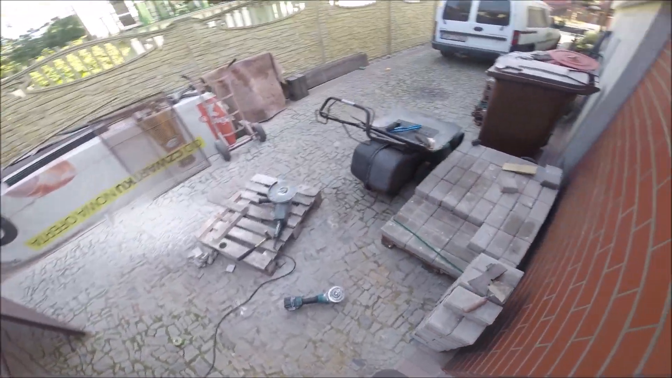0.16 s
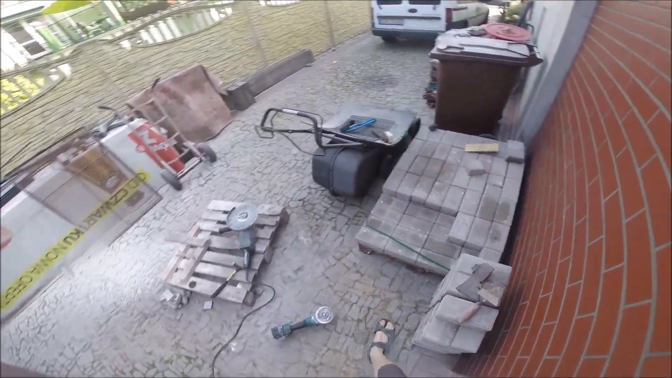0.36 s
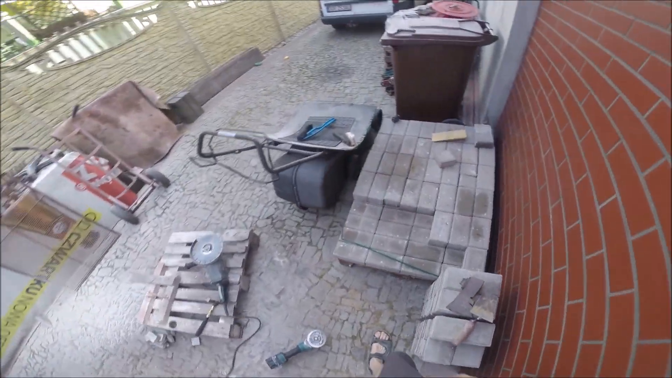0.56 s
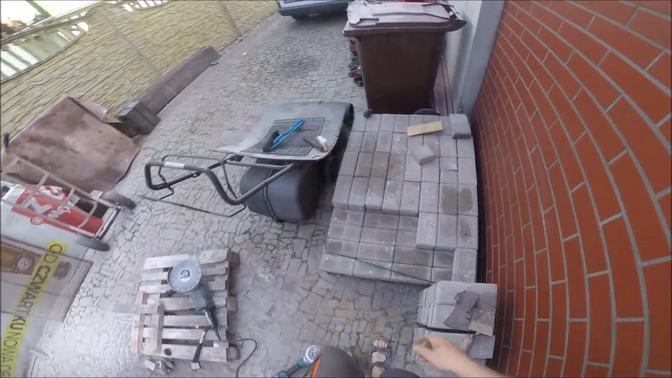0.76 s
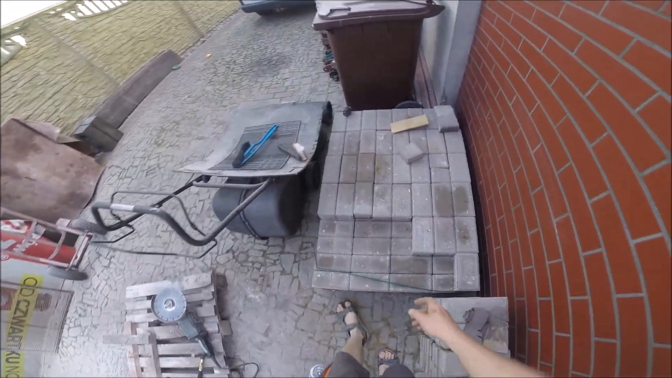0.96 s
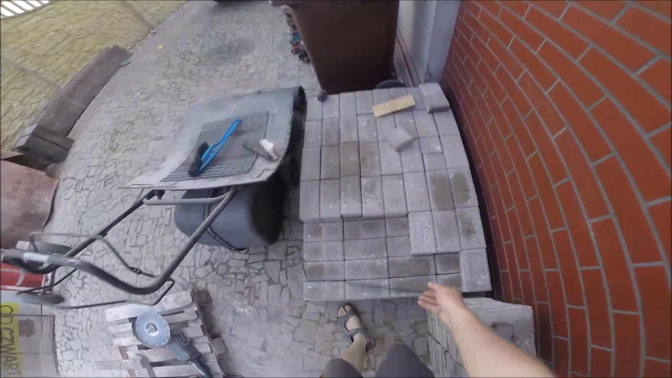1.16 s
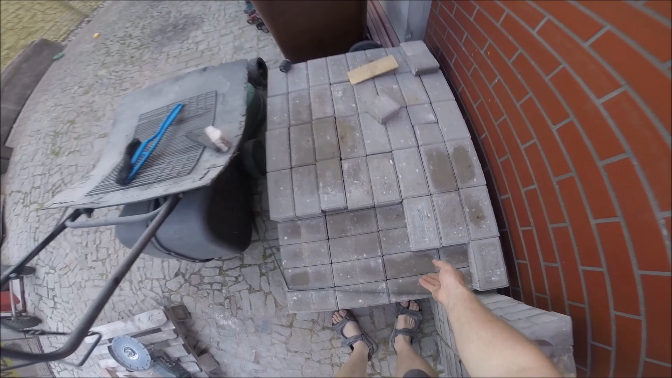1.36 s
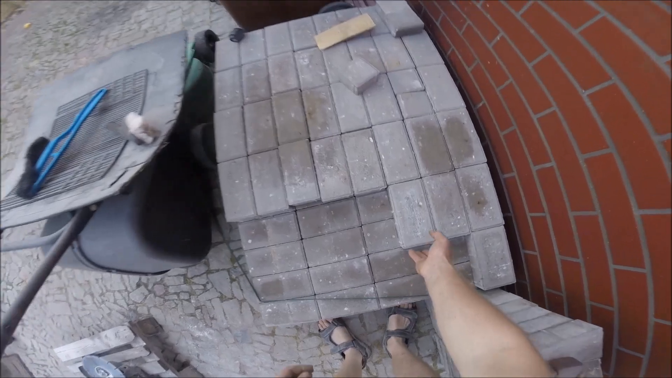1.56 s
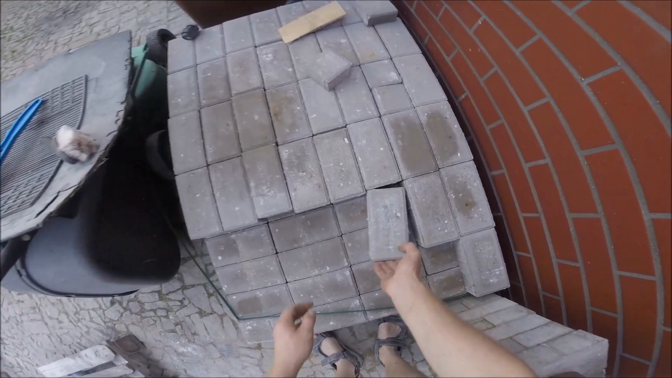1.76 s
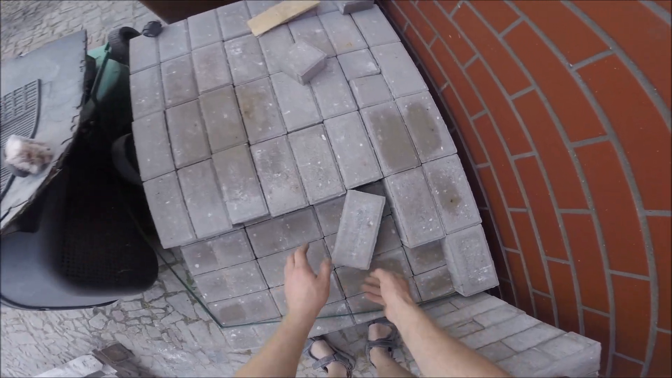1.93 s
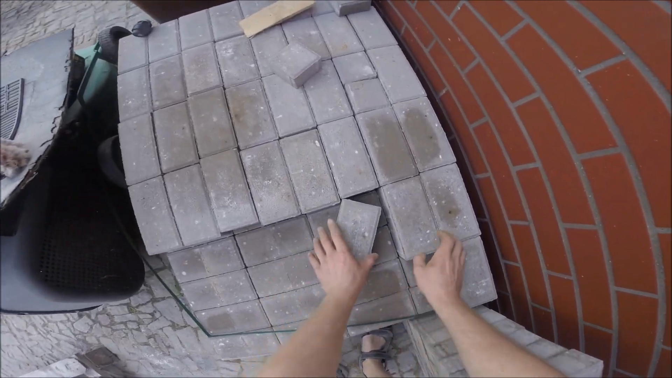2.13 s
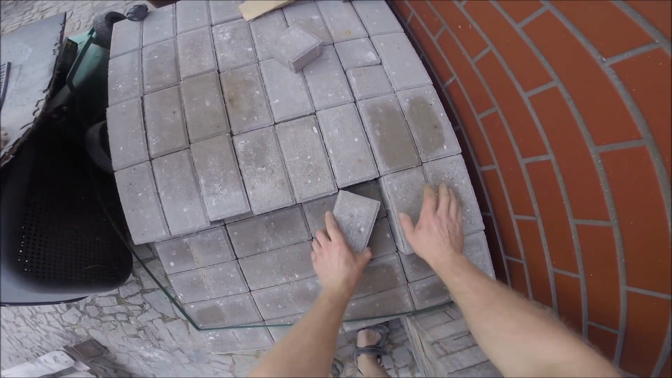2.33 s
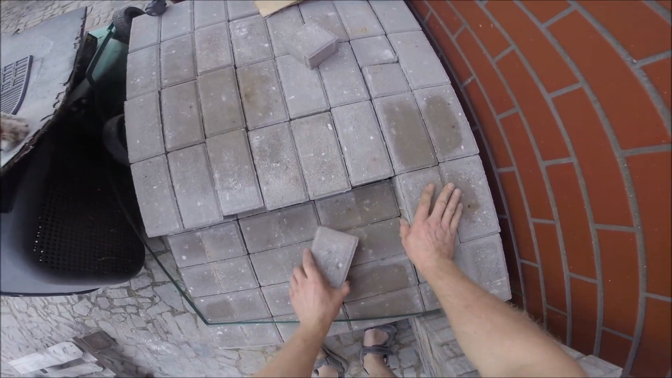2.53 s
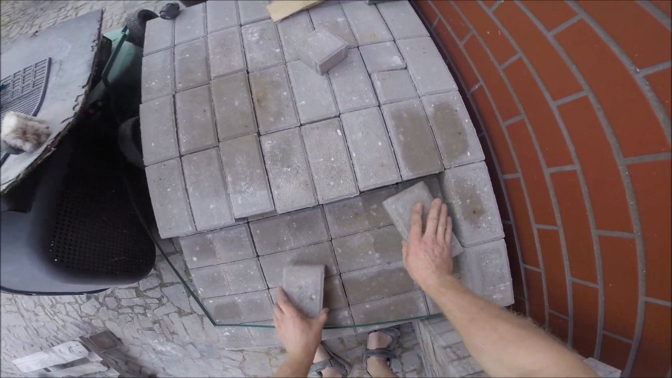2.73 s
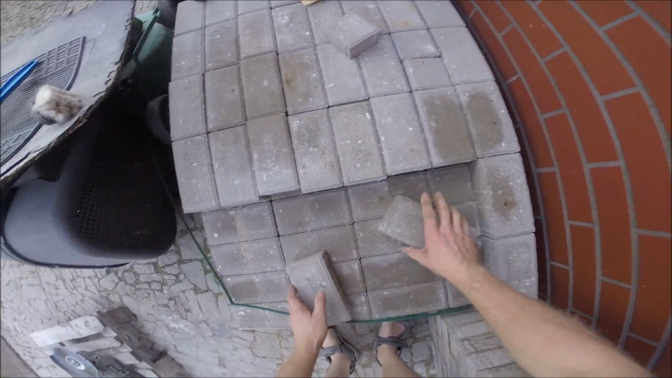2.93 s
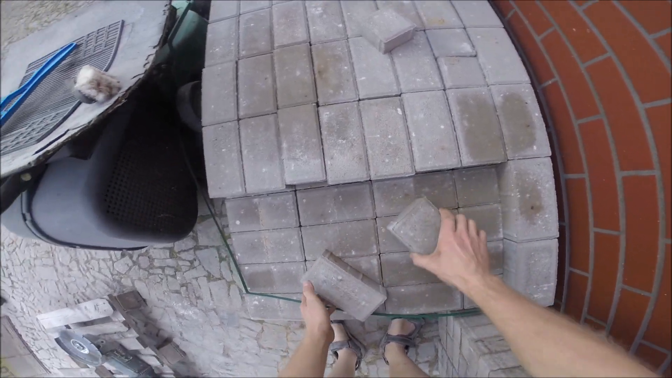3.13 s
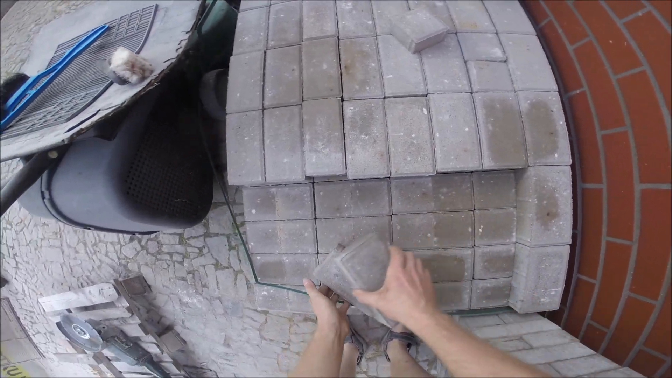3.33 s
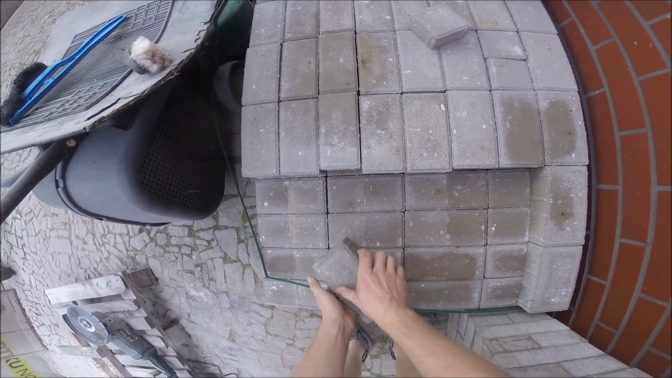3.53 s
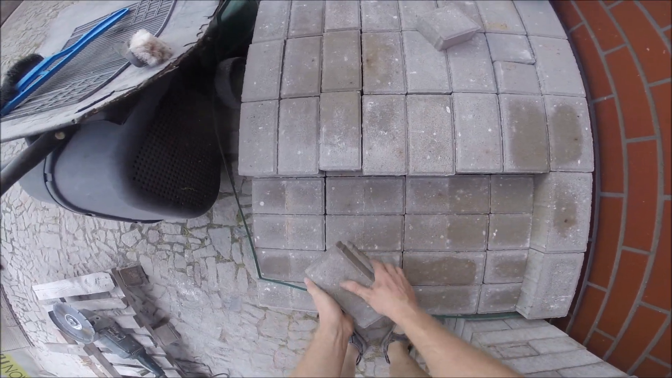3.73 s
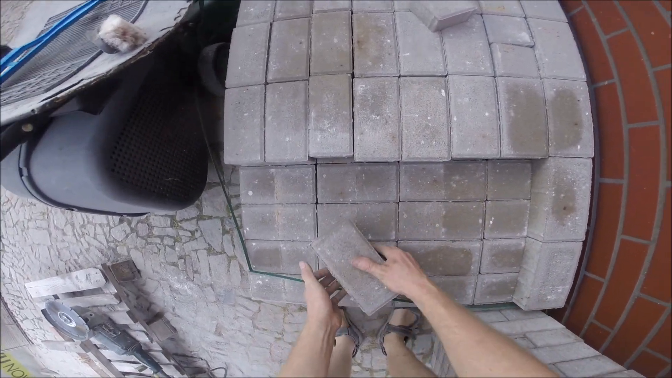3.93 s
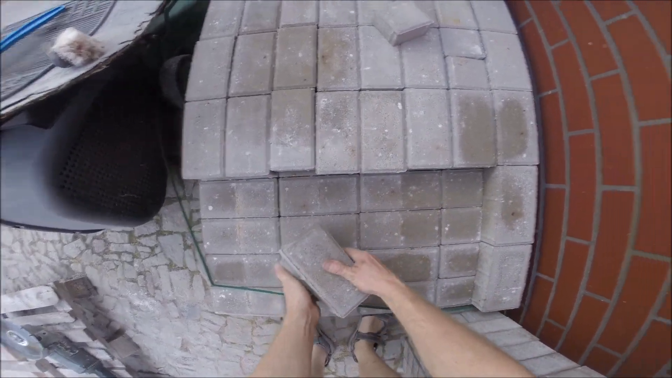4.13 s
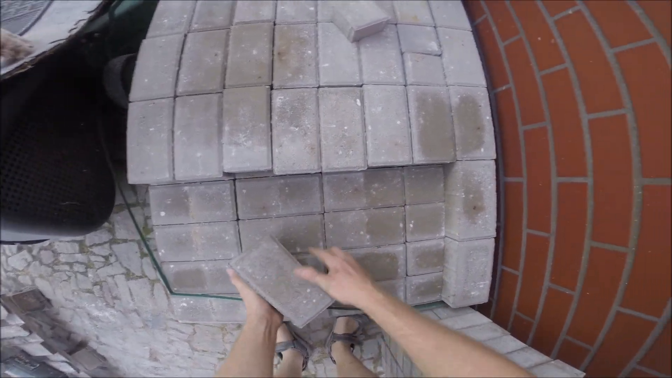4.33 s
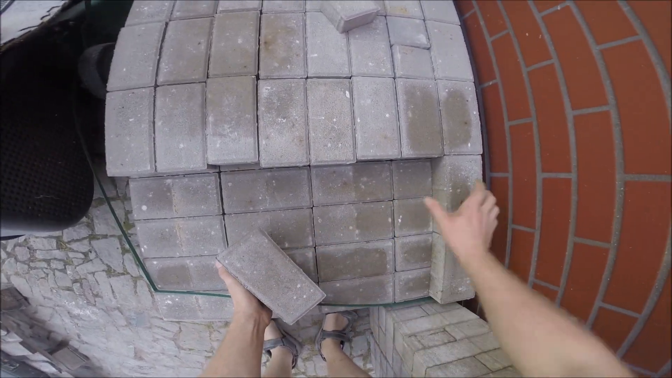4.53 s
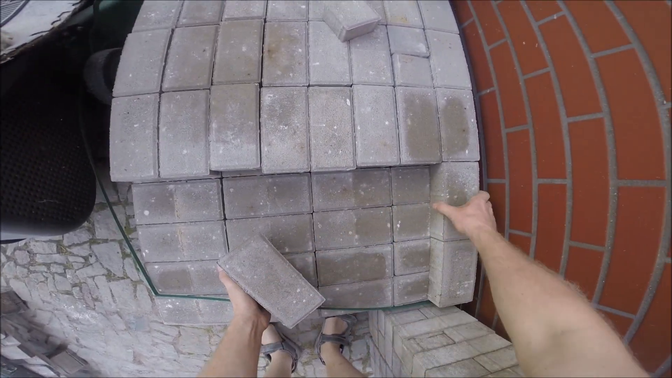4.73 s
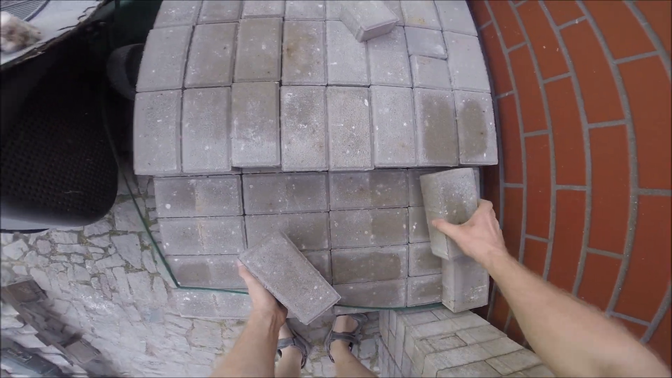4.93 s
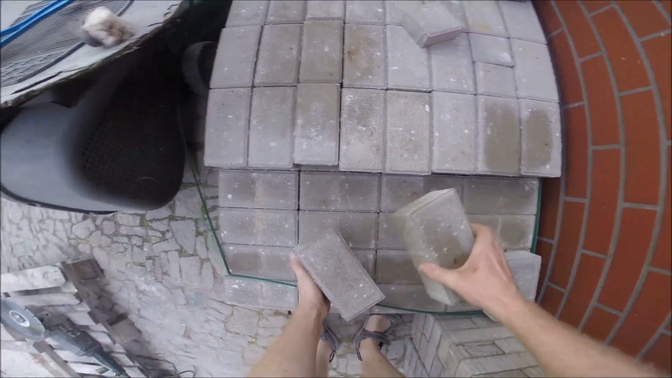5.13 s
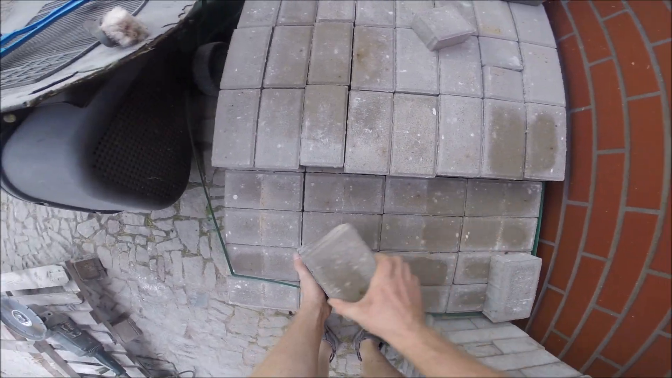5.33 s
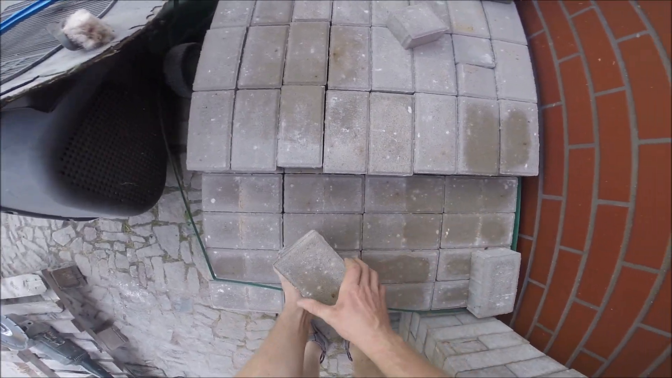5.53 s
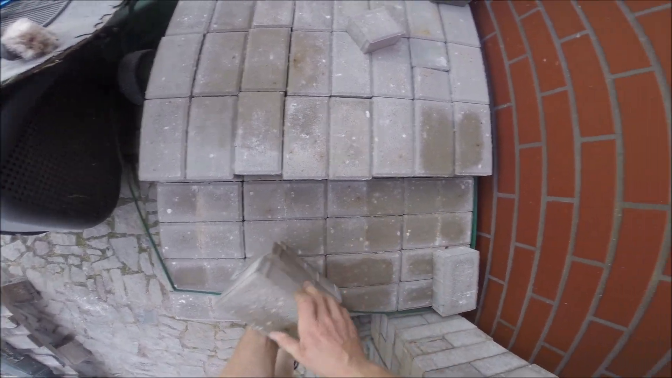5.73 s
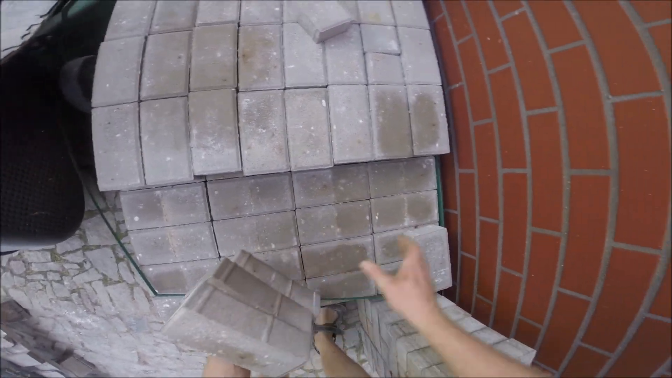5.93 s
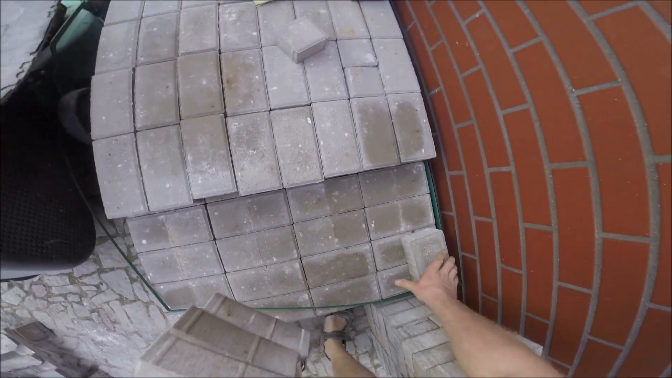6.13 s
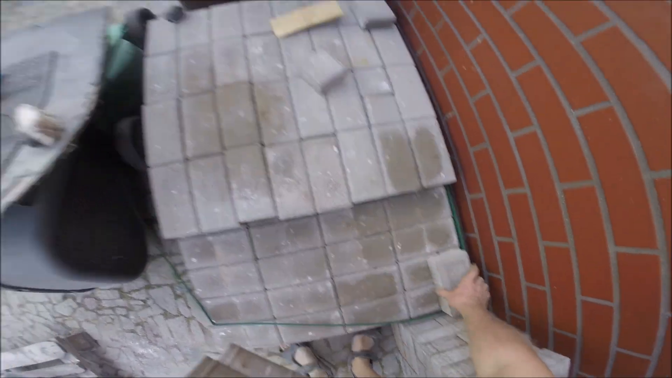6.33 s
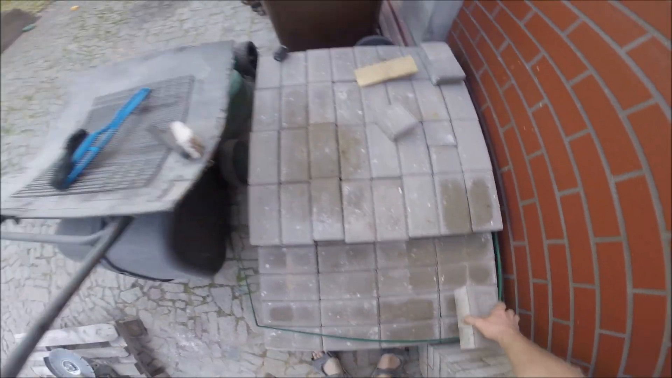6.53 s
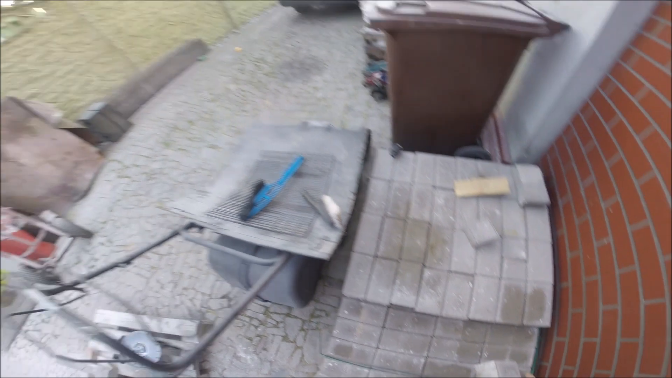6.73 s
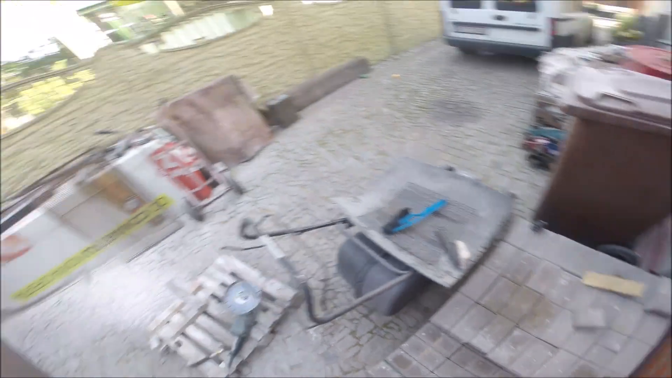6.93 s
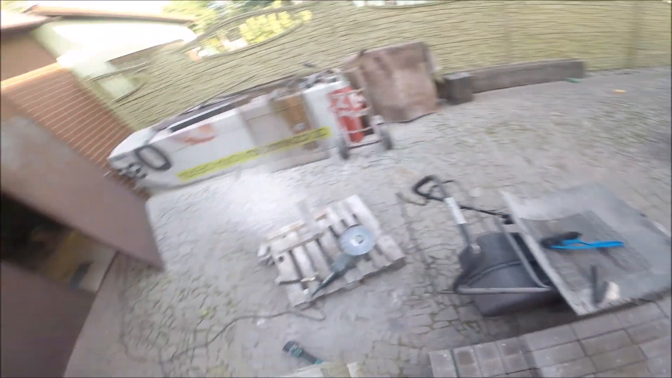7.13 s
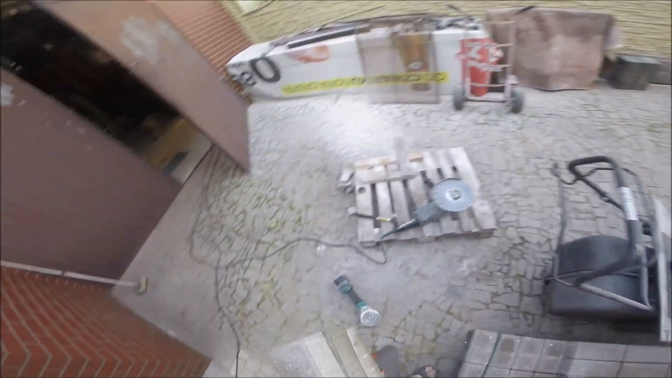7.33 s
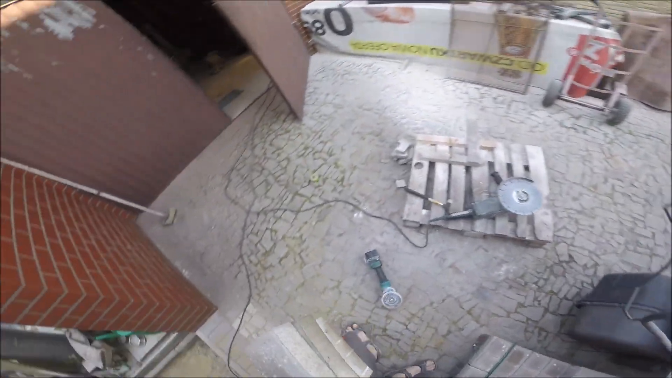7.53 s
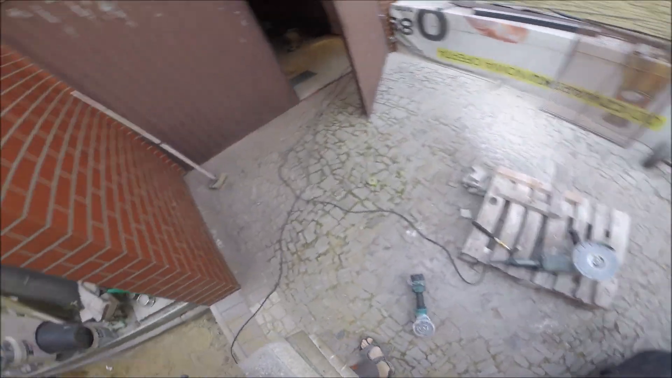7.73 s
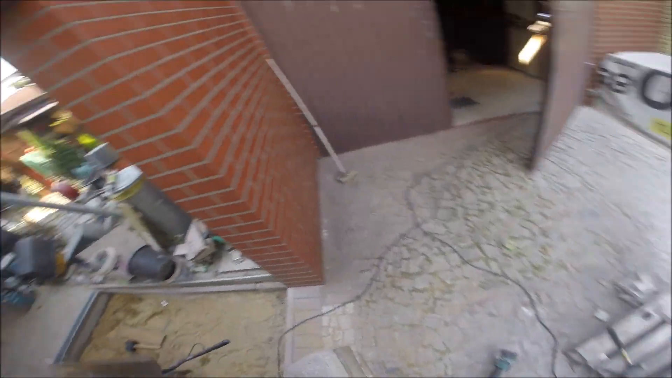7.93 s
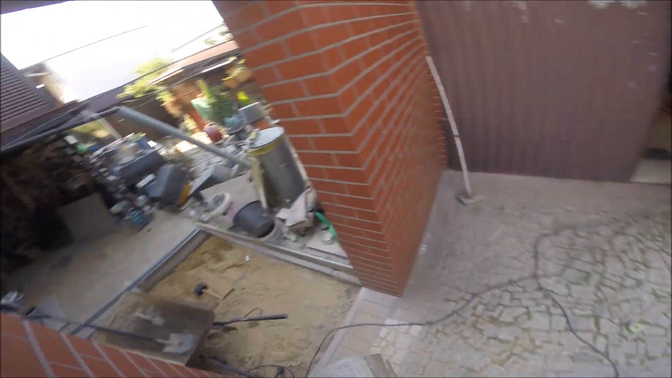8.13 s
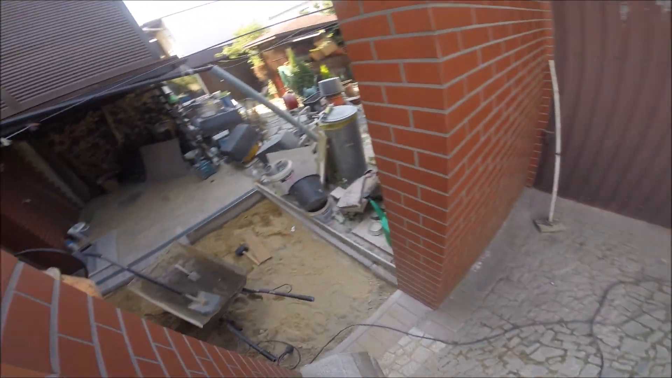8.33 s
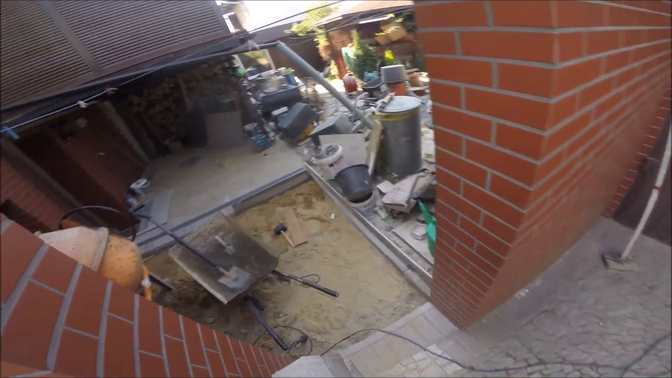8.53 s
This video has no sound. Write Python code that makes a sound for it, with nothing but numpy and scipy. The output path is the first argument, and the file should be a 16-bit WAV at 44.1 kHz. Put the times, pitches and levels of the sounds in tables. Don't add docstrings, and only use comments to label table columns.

```python
import sys
import numpy as np
from scipy import signal
from scipy.fft import rfft, irfft, next_fast_len
from scipy.io import wavfile
from scipy.ndimage import uniform_filter1d, map_coordinates

SR = 44100
rng = np.random.default_rng(int(sys.argv[2]) if len(sys.argv) > 2 else 0)


def invert_db(x):
    u = np.asarray(x, float) / 20
    return 10 ** u


def materialize(psi):
    bounded = np.clip(np.atleast_2d(psi).T, -1, 1)
    quanta = np.round(bounded * 32767).astype(np.int16)
    wavfile.write(sys.argv[1], SR, quanta)


N = 377937
TIME = np.arange(N) / SR

# [t/s, level/dB, clack f/Hz, ring level/dB rel, pallet thud level/dB rel]
CLACKS = [(3.6190, 4.5, 1350, -44.5, -17.5), (3.6214, -3, 1982, -42.5, -19.5), (3.6234, -11, 700, -42, -18),
          (3.6254, -2, 870, -44.5, -30), (3.6424, -11, 1740, -40.5, -25), (3.6424, -6.5, 680, -46.5, -22.5),
          (3.6447, -8.5, 740, -45.5, -29.5), (3.647, -3, 895, -46.5, -33), (5.511, 6.5, 1540, -49.5, -37.5),
          (5.5141, -7.5, 1195, -40.5, -36), (5.5183, 5.5, 1700, -32.5, -32.5),
          (5.5240, -14.5, 1920, -22.5, -33), (5.527, -13, 1660, -32.5, -23),
          (5.5297, -14.5, 1300, -34, -24)]
# [t/s, level/dB, clack f/Hz, ring level/dB rel, pallet thud level/dB rel]
KNOCKS = [(1.133, -25.5, 1064, -45, -16), (3.576, -27, 1100, -16.5, 7.5), (3.705, -23, 930, -18, -4.5),
          (3.835, -31, 640, -20, -3), (3.886, -30, 1190, -33, -22), (3.908, -23.5, 1240, -32, -13),
          (3.986, -27.5, 1270, -34, -21), (4.129, -37, 1300, -20, -14), (4.172, -30, 674, -15, -18),
          (4.314, -52, 1155, -19, -3), (4.407, -45.5, 1030, -24, -9), (4.484, -31, 1090, -18.5, -11),
          (4.594, -53.5, 1090, -25, -17), (4.735, -51, 1090, -25, -20), (4.804, -42, 847, -18, -12.5),
          (4.8367, -22, 802, -39, -7.5), (4.884, -22.5, 915, -24, -3), (4.9071, -18.5, 840, -29, -27),
          (4.9228, -14.5, 870, -52, -13), (4.966, -31, 735, -27, -23), (5.04, -34.5, 984, -16, -21),
          (5.0774, -24.5, 946, -25, -23.5), (6.228, -44, 785, -29.5, 3)]
# [t/s, level/dB, clack f/Hz, ring level/dB rel]
JUDDERS = [(1.828, -30.5, 1060, -24), (1.862, -27, 990, -34), (1.877, -20.5, 1020, -20),
           (1.9, -23, 950, -34), (1.923, -20, 1130, -40), (1.941, -18, 1110, -41), (1.957, -19, 1100, -21),
           (1.983, -23.5, 1050, -23), (2.06, -24, 1020, -41), (2.415, -39.5, 730, -11.5),
           (2.427, -30.5, 950, -32), (2.4612, -24, 1140, -28), (2.493, -27.5, 1080, -18),
           (2.52, -28, 1160, -9), (2.547, -20.5, 1120, -20.5), (2.565, -22, 1100, -22),
           (2.622, -17.5, 960, -16.5), (2.6633, -10.5, 820, -17.5), (2.716, -16.5, 890, -8),
           (2.735, -13.5, 844, -5.5), (2.794, -14, 930, -24.5), (2.8135, -4, 860, -31),
           (2.841, -19.5, 1100, -3.5), (2.856, -14, 970, -40), (2.9, -19, 1000, -16.5),
           (2.9195, -6, 1094, -32.5), (3.021, -18.5, 930, -44)]
# [t/s, level/dB, f/Hz, pallet thud level/dB rel]
BITES = [(1.803, -28, 1100, -17), (1.936, -14.5, 600, -4.5), (1.977, -20.5, 500, 0.5),
         (2.001, -25, 1110, -13), (2.026, -20.5, 1000, -7.5), (2.612, -20, 1300, -14.5),
         (2.640, -19.5, 981, -11), (2.700, -26, 900, -5.5), (2.745, -19, 999, -16), (2.902, -8, 896, -12),
         (2.959, -19, 796, -10), (2.973, -14.5, 895, -12.5), (3.263, -27.5, 499, -2.5),
         (3.6395, 2, 1150, -26.5), (3.918, -19, 1200, -16.5), (4.157, -34.5, 500, -5),
         (4.183, -17.5, 1220, -21.5), (4.190, -22.5, 900, -14), (4.201, -21, 800, -8),
         (4.208, -16, 800, -9.5), (4.214, -20.5, 750, -4), (4.2194, -13, 704, -10.5),
         (4.229, -27, 495, -10), (4.9054, -12.5, 1070, -22), (4.9196, -8, 1130, -19)]
# [t/s, level/dB, f/Hz]
RIDGES = [(1.91, -19.5, 1170), (1.964, -20, 856), (2.01, -22, 1070), (2.632, -17, 947), (2.648, -15, 816),
          (2.688, -22.5, 872), (2.77, -19, 746), (2.78, -12, 907), (2.825, -12.5, 977), (2.835, -11.5, 915),
          (2.846, -9.5, 961), (2.87, -11.5, 961), (2.884, -8.5, 1040), (2.91, -8, 1030), (2.93, -19, 1110),
          (2.944, -19.5, 921), (2.984, -25, 910), (2.999, -17, 894), (3.031, -24, 1050), (3.043, -24, 646),
          (3.055, -24.5, 654), (3.164, -26, 600), (3.179, -25, 1060)]
# [t/s, snap level/dB, gain-control dip level/dB]
CRACKS = [
    (3.6200, -25, 0),
    (5.5123, -31, 7.5),
]
# [t/s, level/dB]
CHIPS = [(1.8023, -54), (1.9365, -43), (1.9566, -42.5), (2.4628, -49), (2.4916, -49), (2.5206, -43.5),
         (2.548, -40), (2.6118, -37), (2.637, -40.5), (2.6557, -38.5), (2.663, -34.5), (2.684, -54.5),
         (2.7011, -38), (2.7161, -36), (2.733, -35.5), (2.804, -33), (2.8103, -30.5), (2.840, -31),
         (2.846, -35), (2.8807, -34), (2.902, -36.5), (2.9715, -37), (3.0434, -41), (3.1287, -41),
         (3.1636, -45), (3.2499, -43), (3.62, -28.5), (3.6398, -29), (3.7045, -41), (3.8854, -46.5),
         (3.909, -46), (3.9195, -43.5), (3.9864, -52), (4.18, -43), (4.203, -49), (4.9191, -55),
         (4.971, -41), (5.077, -48), (5.5183, -26.5), (5.524, -38.5)]
# [f/Hz, level/dB, t60/s]
EDGE_MODES = [(2700, 0, 0.029), (3085, -1, 0.021), (2340, -2, 0.023)]
# [t/s, level/dB]
EDGE_BLOWS = [
    (3.6198, -22),
    (3.6393, -19.5),
    (3.6443, -28.5),
]
CLACK_T60, JUDDER_T60, KNOCK_T60, BITE_T60, RIDGE_T60 = 0.0095, 0.017, 0.013, 0.006, 0.013
SOFT_LINGERS = 0.00036
THUD_DB, THUD_SHRINKS, THUD_MOST_DB = -30.5, 1.11, -3.5
BITE_RING_DB, RIDGE_DB, RIDGE_RING_DB, RIDGE_THUD_DB = -46, -3.5, -35, -9.5
SHARP_RISE_S, SOFT_RISE_S = 0.00077, 0.002
SCATTERS_OVER_DB = -21

# [t/s touch, rise/s, fall/s, crest level/dB, block ring level/dB rel]
DRAGS = [(1.773, 0.11, 0.075, -31, -24), (1.871, 0.12, 0.065, -29.5, -19), (2.402, 0.027, 0.029, -45, -22),
         (2.456, 0.11, 0.035, -37, -10), (2.61, 0.0078, 0.13, -34, -5.5), (2.685, 0.14, 0.16, -20, -30.5),
         (2.85, 0.063, 0.073, -19, -20), (2.942, 0.048, 0.18, -27.5, -20), (3.04, .14, 0.11, -34.5, -6),
         (3.16, 0.067, 0.15, -39, -23), (3.575, 0.0032, 0.054, -37, -24), (3.65, 0.0096, 0.12, -30, -20),
         (3.814, .02, 0.071, -40, -17), (3.883, 0.017, 0.1, -35, -24.5), (3.988, 0.015, 0.071, -33, -23),
         (4.128, 0.074, 0.061, -28.5, -17.5), (4.476, 0.022, 0.026, -43, -28),
         (4.792, 0.12, 0.079, -37, -20), (4.93, 0.0594, 0.089, -35.5, -19),
         (5.074, .006, 0.052, -35.5, -27)]
# [t/s touch, rise/s, fall/s, level/dB]
SLIM = [
    (4.85, 0.073, 0.2, -61),
    (5.074, .006, 0.066, -59),
]
# [t/s touch, rise/s, fall/s, level/dB, hollow f/Hz]
HOLLOWS = [(1.8, 0.13, 0.079, -36.5, 990), (2.2, 0.11, .02, -52, 2010), (2.609, 0.0071, 0.12, -39, 1950),
           (2.611, .006, 0.092, -33, 923), (2.78, 0.1, 0.1, -26.5, 1020), (2.76, 0.1, 0.21, -47, 3110),
           (3.02, 0.14, .08, -59, 4030), (3.05, .13, 0.12, -36, 1280), (2.92, 0.036, .14, -43, 2050),
           (3.12, .05, .06, -44, 2020), (3.25, .05, .08, -50.5, 800), (3.65, .02, .12, -47, 2000),
           (3.62, 0.0077, 0.082, -47, 3100), (4.14, 0.067, 0.085, -32.5, 744)]
# [t/s, upper mode level/dB, lower mode level/dB rel]
PINGS = [(1.884, -41, -8), (1.937, -45, -4), (1.958, -39.5, -3), (1.977, -40, -7), (2.024, -47, -10),
         (2.613, -33, -10), (2.81, -32, 4.5), (2.847, -29.5, 2.5), (3.044, -30.5, -12), (3.093, -34, -15),
         (3.13, -29.5, -13), (3.137, -32.5, -18), (3.151, -32, -16), (3.176, -29.5, -17),
         (3.183, -31, -9.5), (3.17, -45, -1), (3.195, -42, 1), (3.22, -44.5, 4.5), (3.6205, -33, -17.5),
         (3.6245, -33, -18), (3.640, -29, -15.5), (4.884, -50, -10), (4.895, -45, -13), (3.251, -42, -8),
         (3.94, -49, -9), (4.16, -49, -15), (4.187, -42, -13), (4.203, -47, -13), (4.211, -43, -13),
         (4.228, -52, -14)]
# [t/s from, t/s to]
MUTED = [
    (3.07, 3.3),
    (3.6, 3.8),
    (4.1, 4.3),
]
TOUCH_DB, LIFT_DB = 16, 27
RISE_BEND, FALL_BEND = 1.1, 1.38
RUMBLE_DB, RUMBLE_SWING, RING_SWING = -4.5, 0.75, 0.8
THIRD_RING_DB, MUTE_DB = -21, -10.5
HOLLOW_Q = 11
OVERTONE_DB, WEDGED_DB = -43.5, 7.5
WEDGED_UNTIL_S, LAST_BLOCK_S = 3.4, 4.7
PING_T60, PING_RISE_S = 0.04, 0.00083
STACK_SHIFT, SHIFTS_PER_S = 0.07, 20

# [f/Hz, width/Hz, level/dB]
STACK = [(640, 310, -5), (784, 260, -1.5), (1020, 129, 2.5), (1190, 176, -2), (1490, 180, -15),
         (1830, 300, -10.5), (2124, 150, -15.5), (3070, 390, -26.5)]
# [f/Hz, width/Hz, level/dB]
PALLET = [(148, 42, 0), (267.3, 110, 1.5), (411, 360, -4.5)]
# [f/Hz, width/Hz, level/dB]
RING = [(5680, 180, -10), (5794, 45, -2.5), (6264, 92, -3), (7680, 60, -28.5)]
# [f/Hz, width/Hz, level/dB]
OVERTONE = [(12200, 130, -1), (12430, 150, 0), (12900, 800, -7)]
# [f/Hz, level/dB]
CASE = [(40, -29), (95, 1.5), (130, 2.5), (2200, -3), (3500, -6.5), (6000, -5), (10000, -23),
        (15000, -37.5)]
# [f/Hz, level/dB per Hz]
DUST = [(1500, -27.5), (2500, -1), (4500, -10), (7000, -13.5), (9000, -20), (10500, -37), (13500, -33.5),
        (15000, -54)]

# [t/s touch, rise/s, fall/s, sole level/dB]
SCUFFS = [(.43, 0.038, 0.36, -45.5), (.92, 0.27, 0.14, -45.5), (1.46, 0.044, 0.36, -47),
          (6.47, 0.072, 0.19, -45.5), (6.625, 0.035, 0.26, -43), (6.75, 0.028, 0.29, -42),
          (6.85, 0.32, 0.41, -52), (7.685, 0.029, 0.22, -45), (7.8, 0.11, 0.1, -53),
          (8.36, 0.057, 0.54, -54), (8.535, .035, .05, -48)]
# [t/s, level/dB, sole knock level/dB rel]
TICKS = [(0.448, -49, 12), (0.479, -46, 17.5), (0.534, -40, -17), (0.845, -46, 1), (0.979, -51, 19.5),
         (1.084, -44, 9), (1.208, -49, -9), (1.482, -44, 10), (1.5045, -38, 13.5), (6.445, -59, 29),
         (6.4974, -43, -20), (6.539, -37.5, 9), (6.578, -47, -13), (6.6347, -32.5, -4), (6.674, -51, 2),
         (6.769, -29, -18), (6.838, -35, -12), (6.79, -51, -15), (6.644, -50, -12), (7.006, -39.5, 7),
         (7.694, -49, 22.5), (8.3894, -57, 10.5)]
# [t/s touch, rise/s, fall/s, level/dB, f/Hz]
RASPS = [(1.53, 0.032, 0.28, -65, 3030), (6.535, .01, .04, -58, 3520), (6.63, .015, 0.025, -55, 3780),
         (6.762, 0.013, 0.068, -60, 4000), (6.8, 0.027, 0.035, -50.5, 4040), (7.07, 0.045, 0.079, -65, 856),
         (7.19, .05, 0.16, -57.5, 740), (7.74, 0.11, .2, -67, 2620), (8.385, .03, .15, -61, 880)]
# [f/Hz, level/dB per Hz]
SOLE = [(150, -29), (250, -1), (486, -2.5), (1060, 3.5), (1390, -9), (2500, -37), (3250, -72), (5500, -120)]
# [f/Hz, level/dB per Hz]
GRIT = [(1180, -9), (2000, 3.5), (2440, -2.5), (4010, -4), (5230, -12.5), (6760, -6.5), (10500, -24.5),
        (14500, -31)]
GRIT_DB, GRIT_SWING, RASP_Q = -9, 0.82, 4.3

# [f/Hz, t60/s]
WALL = [(200, 0.14), (900, 0.48), (1700, 0.26), (3000, 0.053), (6000, .3), (12000, 0.24)]
# [f/Hz, level/dB per Hz]
MURMUR = [(35, -38), (60, -5.5), (95, -2.5), (123, -3.5), (289, -6), (364, -10), (491, -5.5), (1560, -17),
          (2910, -20.5), (7860, -29.5), (9020, -34), (12500, -35), (15000, -37.5)]
# [t/s, half length/s, level/dB over calm]
GUSTS = [(1.57, 0.11, 4.5), (2.948, 0.26, 10), (3.65, 0.087, 3.5), (5.3, .3, -2.5), (6.75, 0.31, 6),
         (7.905, 0.073, 11.5)]
# [t/s, level/dB]
FACING = [(0, 4.5), (3.5, -2.5), (6.4, 4), (7.1, -9), (7.7, 2), (8.05, 7.5), (8.57, 2.5)]
# [multiple of MOTOR_HZ, level/dB rms]
MOTOR = [(1, -66), (2, -71), (3, -78.5), (4, -73), (5, -71)]
# [f/Hz, level/dB rms]
WHINE = [(2927, -90), (5854, -90), (8781, -79), (11688, -90), (11718, -85), (14625, -83)]
MOTOR_HZ = 99
CALM_DB, LUMPS_DB = -62, 2.6
MURMUR_DB, MURMUR_STIRS = -57, 0.15


def list_blows():
    blows = [(*row, CLACK_T60 - SOFT_LINGERS * row[1]) for row in CLACKS]
    blows += [(*row, KNOCK_T60) for row in KNOCKS]
    for row in JUDDERS:
        blows.append((*row, min(THUD_DB - THUD_SHRINKS * row[1], THUD_MOST_DB), JUDDER_T60))
    blows += [(s, db, hz, BITE_RING_DB, thud_db, BITE_T60) for s, db, hz, thud_db in BITES]
    blows += [(s, db + RIDGE_DB, hz, RIDGE_RING_DB, RIDGE_THUD_DB, RIDGE_T60) for s, db, hz in RIDGES]
    return blows


def clack(t, db, hz, t60, rise, d):
    sound = 2.38 * invert_db(40 * (rise - SHARP_RISE_S) / t60) * ringing(t, hz, t60, rise)
    sound += invert_db(0.12 * db - 14) * ringing(t, 1.4 * hz, 0.67 * t60, 0.75 * rise)
    for k, (c, _, g) in enumerate(STACK):
        level = invert_db(g - 13.5 - 0.32 * db + 1.9 * d[k])
        sound += level * ringing(t, c * (1 + 0.073 * d[k + 8]), 2.71 * t60, 0.0013)
    upper_face = ringing(t, 2050 * (1 + 0.06 * d[15]), 0.6 * t60, 0.0006)
    return sound + invert_db(-0.2 * db - 13.5) * upper_face


def knocks():
    low, high, linger, chips = np.zeros((4, N + SR))
    long = np.arange(SR // 3) / SR
    t = long[:SR // 14]
    blows = list_blows()
    draws = rng.standard_normal((len(blows), 16))
    fade = invert_db(-60 * long / 0.2) * (1 - np.exp(-long / 0.0045))
    fade += 0.05 * np.exp(-((long - 0.11) / 0.05) ** 2)
    for (s, db, hz, ring_db, thud_db, t60), d in zip(blows, draws):
        rise = SOFT_RISE_S if t60 in (JUDDER_T60, RIDGE_T60) else SHARP_RISE_S
        t60 = np.clip(t60, 0.003, 0.05)
        thud = sum(invert_db(g + thud_db - 4.5) * ringing(t, c * (1 + 0.12 * d[k + 4]), 0.072, 0.0023)
                   for k, (c, _, g) in enumerate(PALLET))
        ring = sum(invert_db(g + ring_db + 1.2 * d[k + 12]) * ringing(t, c, 0.028, 0.00055)
                   for k, (c, _, g) in enumerate(RING))
        start = round((s + 0.0006 - 0.6 * (rise - SHARP_RISE_S)) * SR)
        low[start:][:len(t)] -= invert_db(db) * (clack(t, db, hz, t60, rise, d) + thud)
        if db > SCATTERS_OVER_DB:
            knots = long[::500]
            echoes_db = 3.5 * np.interp(long, knots, rng.standard_normal(len(knots)))
            noise = rng.standard_normal(len(long)) * invert_db(echoes_db)
            modes = [(0.4 * hz, 350, -11), (0.71 * hz, 400, -5), (1.12 * hz, 420, 0),
                     (1.42 * hz, 500, -2), (1.9 * hz, 900, -7)]
            low[start:][:len(long)] += invert_db(db - 40.5) * fade * steep(noise, modes, 2.4)
        high[start:][:len(t)] += invert_db(db) * ring
        linger[start:][:len(long)] += invert_db(db + ring_db - 30) * fade
    for s, db, _ in CRACKS:
        snap = uniform_filter1d(rng.standard_normal(len(t)), size=3)
        high[round(s * SR):][:len(t)] += invert_db(db + 2.5 - 60 * t / 0.0017) * snap
    for s, db in EDGE_BLOWS:
        bend = sum(invert_db(db + g) * ringing(t, hz, t60, 0.0005) for hz, g, t60 in EDGE_MODES)
        high[round(s * SR):][:len(t)] += bend
    for s, db in CHIPS:
        chips[round(s * SR):][:len(t)] += invert_db(db - 60 * t / 0.022) * (1 - np.exp(-t / 0.00056))
    crushed_sand = hiss([(900, -31.0), (1800, 2), (3000, 0), (4300, -7.5), (5500, -8.0),
                         (8000, -21.5), (12000, -35), (15000, -60.5)])
    lingering = linger[:N] * steep(rng.standard_normal(N), RING[1:3], 0.8)
    return muffled(low[:N]) + high[:N] + lingering + chips[:N] * crushed_sand


def drags():
    touch_s, *_, ring_db = np.transpose(DRAGS)
    grit = slips(700, spread_db=2.2, bed=0.6) * invert_db(1.2 * wobble(45))
    catch = slips(160, spread_db=2.5, bed=0.59) * invert_db(1.9 * wobble(40))
    stack = sliding(grit, STACK)
    pallet = unit(muffled(filtered(grit, body(PALLET))))
    mute_db = sum(MUTE_DB * (TIME > a) * (TIME < b) for a, b in MUTED)
    mute_db = uniform_filter1d(mute_db, size=400)
    ring = invert_db(-7.5 + mute_db + 4 * wobble(16)) * steep(catch, RING[:2], 0.53)
    ring += invert_db(-2.0 + 2.8 * wobble(22)) * steep(catch, RING[2:], 0.35)
    ring += invert_db(THIRD_RING_DB + mute_db + 2.5 * wobble(17)) * steep(catch, RING[3:], 0.6)
    sand = unit(filtered(grit + catch, lambda hz: invert_db(along(DUST, hz))))
    wedged = (touch_s < WEDGED_UNTIL_S) | (touch_s > LAST_BLOCK_S)
    rub = strokes(DRAGS) * stack
    rub += strokes(DRAGS, RUMBLE_DB, RUMBLE_SWING) * pallet
    rub += strokes(DRAGS, ring_db, RING_SWING) * ring
    rub += strokes(DRAGS, OVERTONE_DB + WEDGED_DB * wedged, RING_SWING) * steep(catch, OVERTONE, 0.6)
    rub += strokes(DRAGS, 0.45 * ring_db - 14.5) * sand
    slim = strokes(SLIM) * steep(catch, [(7440, 91, 0)], 0.77)
    return pings() + hollows(grit, HOLLOWS, HOLLOW_Q) + invert_db(-2.5) * rub + slim


def pings():
    out, t = np.zeros(N), np.arange(SR // 12) / SR
    upper = ringing(t, RING[2][0], PING_T60, PING_RISE_S)
    lower = ringing(t, RING[1][0], PING_T60, PING_RISE_S)
    for s, db, lower_db in PINGS:
        out[round(s * SR):][:len(t)] += invert_db(db) * (upper + invert_db(lower_db) * lower)
    return out


def hollows(grit, rows, sharpness):
    out = np.zeros(N)
    for row in rows:
        start, hz = round(row[0] * SR), row[4]
        span = slice(start, start + SR // 2)
        out[span] += strokes([row])[span] * steep(grit[span], [(hz, hz / sharpness, 0)], 0.8)
    return out


def sliding(grit, modes):
    place = np.clip(wobble(SHIFTS_PER_S), -1, 1)
    out = np.zeros(N)
    for k in (-1, 0, 1):
        share = np.sqrt(np.clip(1 - np.abs(place - k), 0, 1))
        shifted = [(c * (1 + STACK_SHIFT * k), w, db) for c, w, db in modes]
        out += share * muffled(filtered(grit, body(shifted)))
    return unit(out)


def slips(per_second, spread_db, bed):
    chance, size, sign = rng.random((3, N))
    kicks = (chance < per_second / SR) * invert_db(-spread_db * np.log(size + 0.032)) * np.sign(sign - 0.5)
    return unit(kicks) + bed * rng.standard_normal(N)


def strokes(rows, extra_db=0, swing=1):
    gain = np.zeros(N)
    for (touch, rise, fall, db, *_), more_db in zip(rows, np.broadcast_to(extra_db, len(rows))):
        span = slice(round(touch * SR), round((touch + rise + fall) * SR))
        place = np.interp(TIME[span] - touch, [0, rise, rise + fall], [-1, 0, 1])
        rising_db = TOUCH_DB * np.abs(place) ** RISE_BEND
        falling_db = LIFT_DB * np.abs(place) ** FALL_BEND
        gain[span] += invert_db(db + more_db - swing * np.where(place < 0, rising_db, falling_db))
    return uniform_filter1d(gain, size=200)


def sandals():
    sole = hiss(SOLE)
    rub = strokes(SCUFFS) * invert_db(-4.5 + 2.8 * wobble(50)) * sole
    grains = slips(2500, spread_db=4.5, bed=0.67)
    crunch = unit(filtered(grains, lambda hz: invert_db(along(GRIT, hz))))
    rub += strokes(SCUFFS, GRIT_DB, GRIT_SWING) * invert_db(-3 + 1.7 * wobble(60)) * crunch
    pebble = steep(crunch, [(3330, 1200, 0)], 0.75)
    age = np.arange(SR // 8) / SR
    for s, db, knock_db in TICKS:
        burst = invert_db(db - 8.5 - 60 * age / 0.051) * (1 - np.exp(-age / 0.0015))
        span = slice(round(s * SR), round(s * SR) + len(age))
        rub[span] += burst * (0.73 * crunch[span] + 0.5 * pebble[span] + invert_db(knock_db - 2.5) * sole[span])
    return rub + hollows(crunch + sole, RASPS, RASP_Q)


def wall(x):
    hz, t, z = signal.stft(rng.standard_normal(SR // 2), SR, nperseg=256)
    tail = signal.istft(z * invert_db(-60 * t / along(WALL, hz)[:, None]), SR, nperseg=256)[1]
    return signal.fftconvolve(np.pad(x, (300, 0)), tail / np.linalg.norm(tail))[:N]


def yard():
    gust_db = sum(db * np.exp(-((TIME - s) / half) ** 2) for s, half, db in GUSTS)
    motor_db = np.interp(TIME, *np.transpose(FACING))
    murmur = invert_db(MURMUR_DB + MURMUR_STIRS * gust_db + 0.34 * wobble(7)) * hiss(MURMUR)
    wind = hiss([(10, -10.0), (25, 0.5), (60, -1.5), (90, -14.5), (200, -50.0), (400, -120)])
    wind *= invert_db(CALM_DB + gust_db + LUMPS_DB * wobble(13.0))
    turn = 2 * np.pi * np.cumsum(MOTOR_HZ + 0.59 * wobble(3.8)) / SR
    motor = sum(invert_db(db + motor_db + 1.2 * wobble(6.2)) * np.sin(k * turn) for k, db in MOTOR)
    whine = sum(invert_db(db + 4.5) * np.sin(2 * np.pi * hz * TIME) for hz, db in WHINE)
    return invert_db(gain_control()) * (murmur + wind + motor) + invert_db(0.4 * gain_control()) * whine


def gain_control():
    dips = np.zeros(N)
    for s, _, dip_db in CRACKS:
        dips -= dip_db * (TIME > s) * np.exp(-(np.clip(TIME - s, 0, 9) / 0.5) ** 2.7)
    return dips


def ringing(t, hz, t60, rise):
    return np.sin(2 * np.pi * hz * t) * invert_db(-60 * t / t60) * (1 - np.exp(-(t / rise) ** 2))


def muffled(x):
    return filtered(x, lambda hz: invert_db(along(CASE, hz)))


def body(modes):
    def response(f):
        return sum((-1) ** k * invert_db(db) * 1j * f * w / (c * c - f * f + 1j * f * w)
                   for k, (c, w, db) in enumerate(modes))
    return response


def steep(x, modes, power):
    def response(f):
        h = body(modes)(f)
        return h * np.abs(h) ** power
    return unit(filtered(x, response))


def hiss(spectrum):
    return unit(filtered(rng.standard_normal(N), lambda hz: invert_db(along(spectrum, hz))))


def unit(x):
    return x / np.sqrt(np.mean(x ** 2) + 1e-20)


def along(points, hz):
    f, v = np.transpose(points)
    return np.interp(np.log(hz + 1), np.log(f + 1), v)


def wobble(rate):
    coarse = TIME[::32]
    knots = rng.standard_normal(int(N * rate / SR) + 4)
    return np.interp(TIME, coarse, map_coordinates(knots, [coarse * rate]))


def filtered(x, response):
    m = next_fast_len(len(x) + 4096)
    grid = np.arange(0, SR / 2 + 4, 4.)
    gain = np.interp(np.fft.rfftfreq(m, 1 / SR), grid, response(grid))
    return irfft(rfft(x, m) * gain, m)[:len(x)]


def scene():
    blows, rubbing = knocks(), drags()
    echo = wall(invert_db(-26.5) * blows + invert_db(-21) * rubbing)
    return (blows + rubbing + echo + sandals() + yard())[None]


def top_cut(x):
    return signal.sosfilt(signal.butter(12, 16370, fs=SR, output="sos"), x)


def record(dry):
    limit = [(14900, 0), (15300, -22), (16300, -30), (16500, -80)]
    band = filtered(dry[0], lambda hz: invert_db(along(limit, hz)))
    mix = band / (1 + np.abs(band / 1.02) ** 8) ** (1 / 8)
    return top_cut(mix)


dry = scene()
out = record(dry)
materialize(out)
```